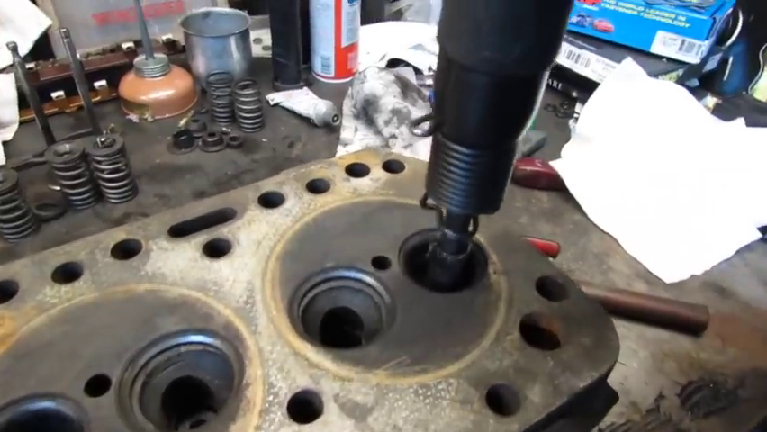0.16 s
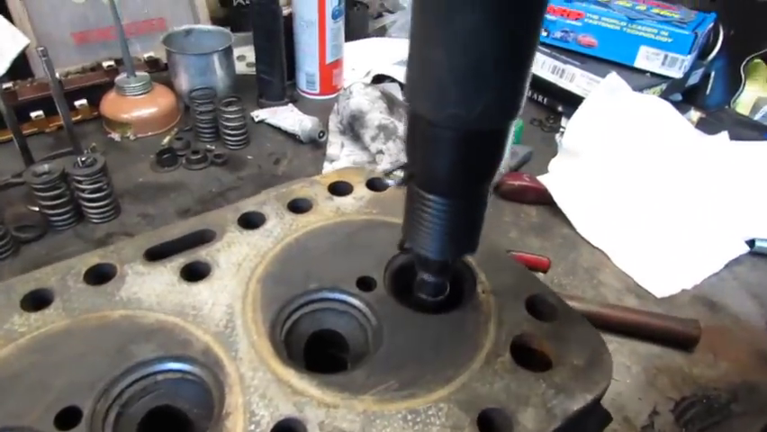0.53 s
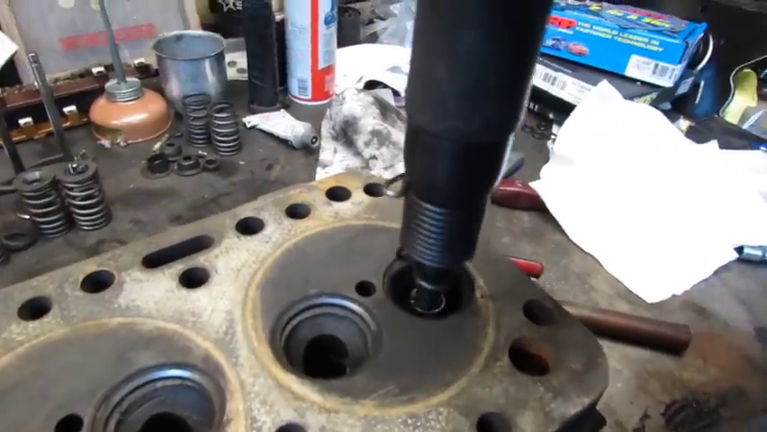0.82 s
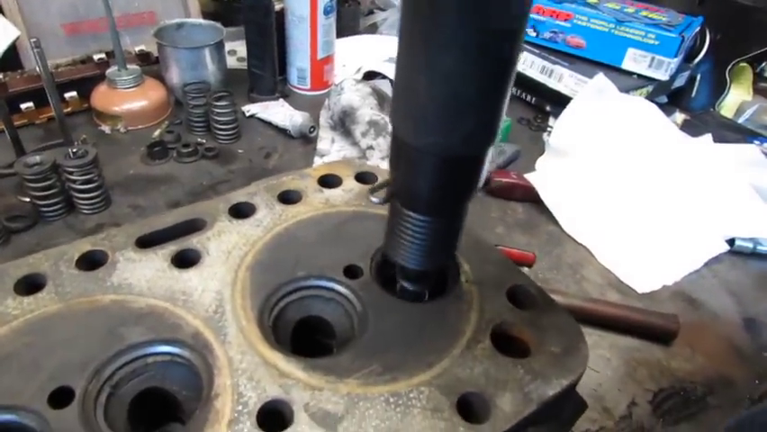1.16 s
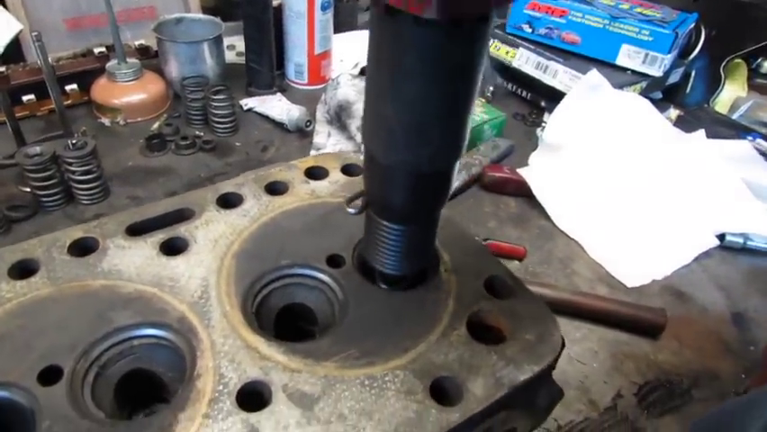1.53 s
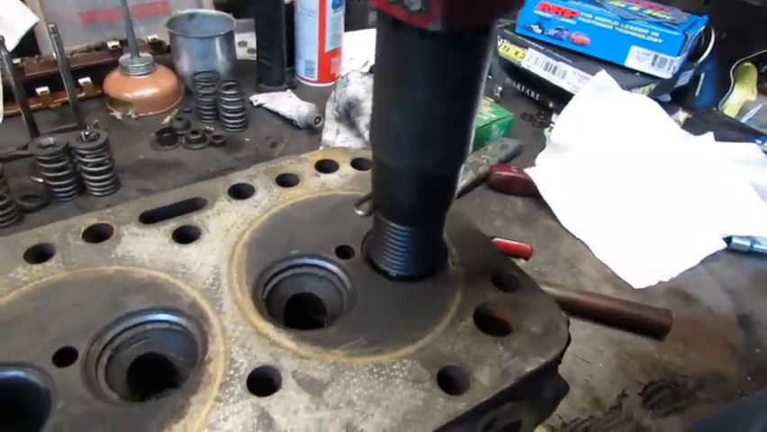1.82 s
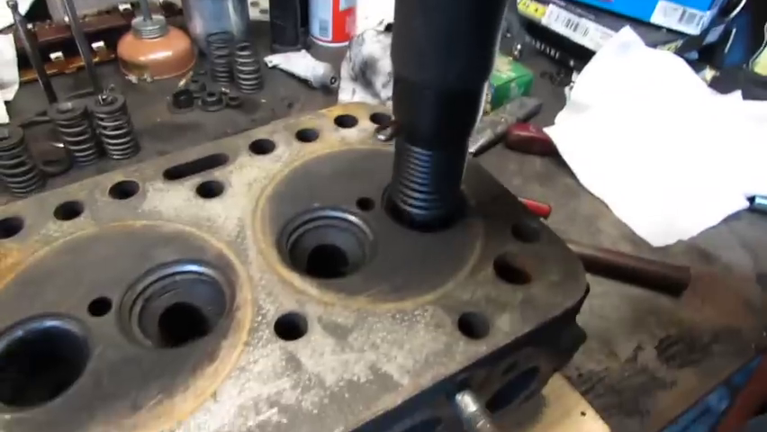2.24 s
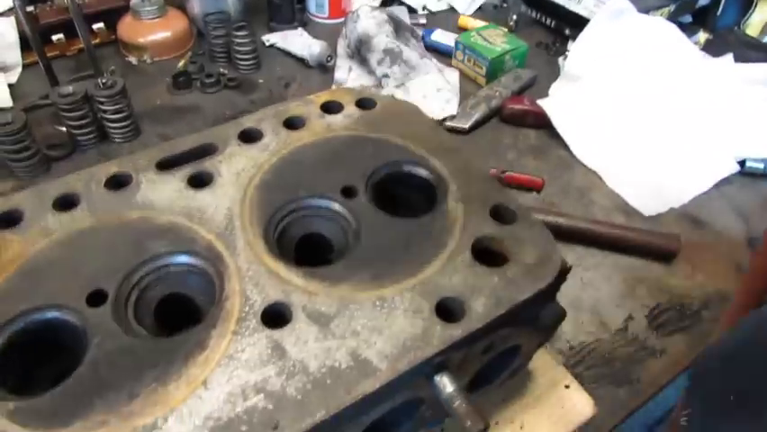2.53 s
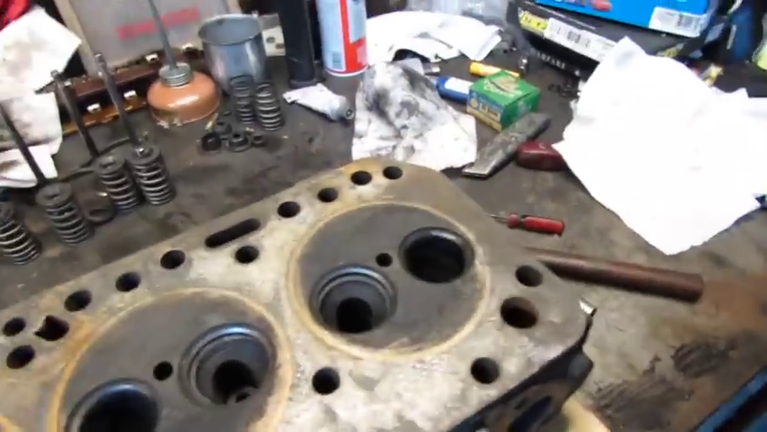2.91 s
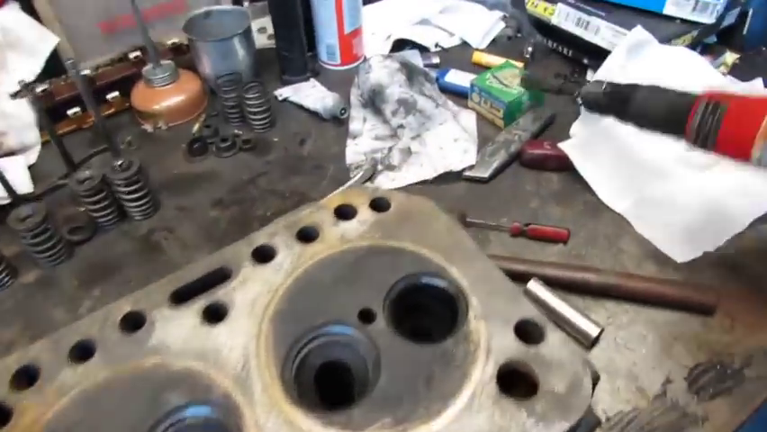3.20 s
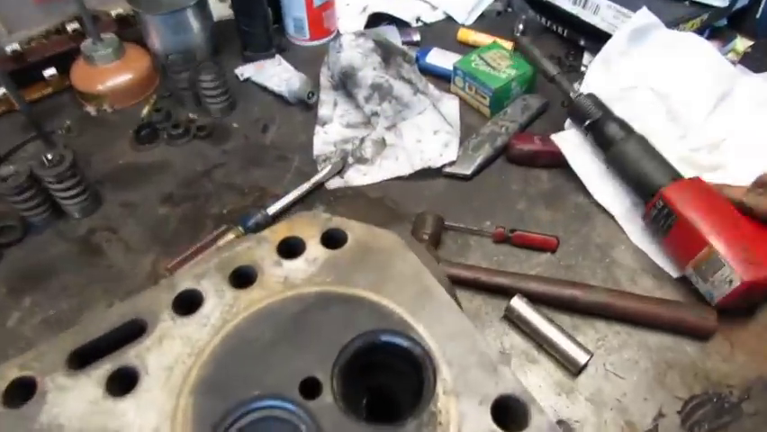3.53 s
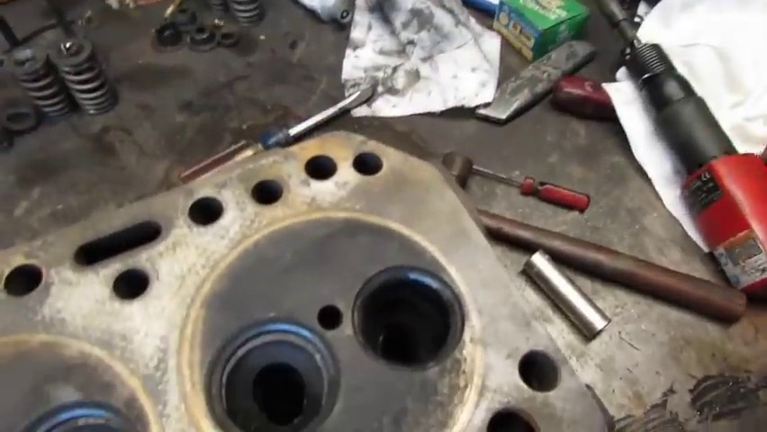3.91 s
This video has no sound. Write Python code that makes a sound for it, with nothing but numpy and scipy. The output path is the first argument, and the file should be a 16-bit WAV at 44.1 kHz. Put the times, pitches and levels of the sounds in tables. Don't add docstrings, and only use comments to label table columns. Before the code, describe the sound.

A pneumatic air hammer rattles loudly in bursts against a cast-iron engine head, then loose metal clinks and the tool is set down.

```python
import sys
import numpy as np
from scipy import signal
from scipy.fft import rfft, irfft
from scipy.io import wavfile
from scipy.ndimage import uniform_filter1d

SR = 44100
rng = np.random.default_rng(int(sys.argv[2]) if len(sys.argv) > 2 else 0)


def level_to_linear(level):
    exponent = np.asarray(level, float) / 20
    return 10 ** exponent


def to_wav(sig):
    pcm = np.clip(np.atleast_2d(sig), -1, 1) * 32767
    pcm = np.round(pcm).astype(np.int16)
    wavfile.write(sys.argv[1], SR, pcm.T)


N = 179001

# [start t/s, end t/s, clatter level/dB, sag over the pull/dB, casting ring re clatter/dB]
PULLS = [
    (0.027, 0.752, -18, 4, -13),
    (0.829, 1.006, -17, 1.5, -17.5),
    (1.135, 1.304, -14, -2.5, -18.5),
    (1.431, 1.568, -13, -5.5, -18.5),
    (1.695, 1.866, -13.5, -7, -27),
    (2.284, 2.371, -16.5, 1.5, -37),
]
# [f/Hz, level/dB, time to fade by 60 dB t60/s]
STEEL = [(2650, -15, 0.021), (3360, -1.5, 0.039), (4060, -23, 0.034), (5200, -16, 0.022), (5560, -7, 0.15),
         (5800, -23, 0.056), (6900, -2.5, 0.17), (7120, -3.5, 0.16), (7390, 10, 0.071), (7820, 2.5, 0.041),
         (8036, 6.5, 0.086), (8570, -4.5, 0.13), (10400, -19, .04), (11440, -23.5, 0.066)]


def unit(x):
    return x / np.sqrt(np.mean(x ** 2) + 1e-18)


def coloured(x, spectrum):
    hz, db = np.transpose(spectrum)
    f = np.fft.rfftfreq(N, 1 / SR) + 1
    gain = level_to_linear(np.interp(np.log(f), np.log(hz), db))
    return unit(irfft(rfft(x) * gain, N))


def stereo(spectrum, like):
    like = np.clip(like, -.99, .99)
    mid, side = (coloured(rng.standard_normal(N), spectrum) for _ in range(2))
    return np.sqrt((1 + like) / 2) * mid + np.sqrt((1 - like) / 2) * side * np.array([[1], [-1]])


def ring(x, modes, spread_db=0., detune=0.):
    out = 0
    for hz, db, t60 in modes:
        chance = rng.standard_normal(2)
        turn = 2j * np.pi * hz * (1 + detune * chance[0]) / SR
        decay = np.log(1000) / (max(t60, .005) * SR)
        pole = np.exp(turn - decay)
        out = out + level_to_linear(db + spread_db * chance[1]) * signal.lfilter([1], [1, -pole], x).imag
    return out


def struck(blows, modes):
    x = np.zeros(N)
    for s, db in blows:
        x[int(s * SR)] = level_to_linear(db)
    return ring(x, modes)


def linger(x, seconds):
    return signal.lfilter([1], [1, -np.exp(-1 / (seconds * SR))], x)


def walk(rate):
    k = int(SR / rate)
    steps = np.repeat(rng.standard_normal(N // k + 1), k)
    return unit(uniform_filter1d(uniform_filter1d(steps, k), k)[:N])


def patchy(x, band_hz, swell_db):
    band = signal.butter(2, band_hz, "band", fs=SR, output="sos")
    return x + signal.sosfilt(band, x) * (level_to_linear(swell_db) - 1)


def dips(x, width_s):
    t = np.arange(-600, 601) / SR
    rebound = .3 * np.exp(-((t - 2.8 * width_s) / (0.98 * width_s)) ** 2)
    dip = rebound - np.exp(-(t / width_s) ** 2)
    return signal.fftconvolve(np.atleast_2d(x), dip[None], "same")


def hammer():
    gains = trigger()
    on = gains[0] > 0
    forward, back = strokes()
    return (pressure_snaps(forward, back, gains[0])
            + gains[0] * punch_clatter(forward, back, on)
            - casting_ring(forward, back, gains[1], on)
            - casting_bell(forward, back, gains[3], on)
            + gains[2] * bore_scrape(forward, back, on)
            + gains[4] * exhaust_gust(forward, on))


def trigger():
    # [t/s, rise/s, t60/s, level/dB]
    slides = [
        (.995, 0.017, 0.083, -35),
        (1.8, 0.043, 0.47, -11),
        (3.675, .015, 0.43, -40),
    ]
    attack_s, attack_db, release_s, release_db = 0.025, -17.5, 0.017, -12
    kick_db, kick_s = 6, 0.13
    thump_db, scrape_db, gust_db = -2.5, -5.5, -3
    ring_grows_db = 1.5
    gust_starts_s, gust_stops_s = 0.014, 0.028
    t = np.arange(N) / SR
    gains = np.zeros((5, N))
    for s, rise, t60, db in slides:
        gains[2] += np.clip(1 + (t - s) / rise, 0, 1) * level_to_linear(db - 60 * np.maximum(t - s, 0) / t60)
    for start, end, db, sag_db, ring_db in PULLS:
        since, left = np.maximum(t - start, 0), np.maximum(end - t, 0)
        share = np.minimum(since / (end - start), 1)
        kick = kick_db * np.exp(-since / kick_s)
        attack = attack_db * np.clip(1 - since / attack_s, 0, 1)
        held = np.clip(since / 0.002, 0, 1) * np.clip(left / 0.0022, 0, 1)
        level = held * level_to_linear(db + sag_db * share + kick + attack)
        shut = level_to_linear(release_db * np.clip(1 - left / release_s, 0, 1))
        ringing = level_to_linear(ring_db + ring_grows_db * (share + 1.5))
        flow = np.clip(left / gust_stops_s, 0, 1) * np.clip(2 * since / gust_starts_s - 1, 0, 1)
        gains += level * np.array([shut, level_to_linear(thump_db) * shut, level_to_linear(scrape_db) * shut, ringing,
                                   level_to_linear(gust_db) * flow])
    return gains


def strokes(jitter_s=.0003, scatter_db=1.5):
    # [back stroke t/s, cycle number]
    pull_cycles = [
        [(.056, 0), (.0837, 1), (.43, 14), (.588, 20), (.6702, 23), (.702, 24), (.735, 25)],
        [(.8205, 0), (.8498, 1), (.9076, 3), (.9335, 4), (.991, 6)],
        [(1.144, 0), (1.284, 5)],
        [(1.4415, 0), (1.553, 4)],
        [(1.7153, 0), (1.7385, 1), (1.788, 3), (1.8402, 5)],
        [(2.282, 0), (2.3071, 1), (2.3546, 3)],
    ]
    forward_s = .015
    blows = np.zeros((2, N))
    for (start, end, *_), cycles in zip(PULLS, pull_cycles):
        chance = rng.standard_normal((60, 2))
        times, count = np.transpose(cycles)
        stroke = np.arange(60)
        s = np.interp(stroke // 2, count, times, right=end)
        s = s + forward_s * (stroke % 2) + jitter_s * chance[:, 0]
        held = (s > start) & (s < end - .003)
        row = 1 - stroke[held] % 2
        blows[row, (s[held] * SR).astype(int)] = level_to_linear(scatter_db * chance[held, 1])
    return blows


def both_ways(forward, back):
    return forward + level_to_linear(-8) * back


def punch_clatter(forward, back, on):
    # [f/Hz, level per Hz/dB]
    clatter_colour = [(710, -18.5), (1200, -7), (2590, -8.5), (3360, -8), (3670, -8.5), (5390, 1),
                      (6150, 1), (11600, -1.5), (15400, -11), (16000, -33.5), (16500, -39.5)]
    # [t/s, level/dB]
    seating = [(0, -6.5), (.3, 1), (.5, 5), (.62, 1), (.75, -1.5), (.95, 3.5), (1.2, 0.5), (1.5, -2),
               (1.75, 5.5), (2.35, -1)]
    steel_levels = [-6, -6.5, -6.5, -3, 0.5, -0.5]
    t = np.arange(N) / SR
    after = linger(both_ways(forward, back), 0.0048)
    rattle = (1 + .6 * uniform_filter1d(after, size=130)) * level_to_linear(2.3 * walk(250))
    swell_db = np.interp(t, *np.transpose(seating)) + 1.2 * walk(25)
    clatter = patchy(stereo(clatter_colour, like=0.38), (4800, 6200), swell_db) * rattle
    chatter = after * rng.standard_normal((2, N)) * (rng.random((2, N)) < .012)
    steel = ring(chatter, [(hz, db / 2, 0.32 * t60) for hz, db, t60 in STEEL])
    pull = np.clip(np.searchsorted([row[0] for row in PULLS], t) - 1, 0, None)
    steel_db = np.array(steel_levels)[pull]
    return clatter / clatter[:, on].std() + level_to_linear(steel_db) * steel / steel[:, on].std()


def casting_ring(forward, back, gain, on):
    # [f/Hz, level/dB, t60/s]
    casting = [(74.3, -14, 0.016), (149.6, -2.5, 0.012), (237, 13.5, 0.057), (370, 8.5, 0.088),
               (414, -6.5, 0.087), (597, 5.5, 0.025), (800, -17.5, .05), (2140, -5, .08),
               (3220, -18.5, .08), (1610, -3, 0.014), (2700, -7.5, 0.009), (4030, -5.5, 0.0077),
               (5520, 3.5, 0.0053)]
    blows = both_ways(forward, back)
    body = ring(blows * gain, casting) / ring(blows, casting)[on].std()
    return level_to_linear(-4.5) * body * np.array([[-.7], [1.1]])


def casting_bell(forward, back, gain, on):
    # [f/Hz, level/dB, t60/s]
    bell_modes = [(992.6, -3, 0.125), (1032, 2, 0.125), (1020, -11.5, 0.054), (927, -16.5, 0.04)]
    # [f/Hz, level/dB, t60/s]
    free_modes = [(1028, 0, .07), (990, -5, .06), (1072, -8, .04)]
    # [t/s, level/dB]
    bell_blows = [(.69, -17.5), (.722, -21), (.743, -14), (.768, -21), (.782, -23), (.98, -15.5),
                  (1.003, -21.5)]
    bell = ring((forward + 0.77 * back) * gain, bell_modes) / ring(forward + back, bell_modes)[on].std()
    bell = bell + struck(bell_blows, free_modes)
    waver_db = -1.0 + 1.5 * walk(98) + 1.2 * walk(22)
    return level_to_linear(waver_db) * bell * np.array([[1.2], [.3]])


def bore_scrape(forward, back, on):
    colour = [(500, -31.0), (800, -11.5), (1050, -9.5), (1500, -5.0), (2500, -3.0), (4200, -4.5),
              (7000, -25.5)]
    scrape = stereo(colour, like=0.081) * (1 + linger(forward + back, 0.0054))
    return level_to_linear(-2.0) * scrape / scrape[:, on].std()


def exhaust_gust(forward, on):
    # [f/Hz, level per Hz/dB]
    gust_colour = [(12, -28.5), (20, 9), (185, -1.5), (329, 1.5), (608, -2.5), (702, -6.5), (1010, -6),
                   (1500, -14), (1950, -49.5), (3300, -120)]
    puffs = .35 + linger(forward, .012)
    gust = stereo(gust_colour, like=-0.47) * puffs * level_to_linear(0.7 * walk(120))
    return gust / gust[:, on].std()


def pressure_snaps(forward, back, gain):
    return dips(gain * (forward + 0.56 * back), 0.00014) * level_to_linear(6.5)


def buffets():
    # [t/s, peak level/dB, share at the left port]
    eddy_table = [(0.0535, -14, 0.4), (0.1057, 2, -0.64), (0.119, -14.5, -0.42), (0.1293, -4.5, -0.069),
                  (0.1357, -4, -1.2), (0.156, -5, -0.96), (0.162, -14.5, 0.11), (0.172, -9, -0.3),
                  (0.1852, 0, -0.17), (0.1985, -9.5, -0.2), (0.219, -7.5, -0.0087), (0.24, -12.5, -0.39),
                  (0.2666, -4, -0.2), (0.2779, -6.5, -1.4), (0.297, -5, -0.29), (0.3207, -5, -0.98),
                  (0.347, -10.2, -0.5), (0.3807, -6.5, -0.89), (0.4754, -15, -1.3), (0.4933, -14.5, 0.11),
                  (0.5443, -15.5, 0.44), (0.6623, -15.5, -1), (0.8382, -12.5, 0.99), (0.878, -19, -0.26),
                  (0.9322, -13.5, -0.3), (0.9634, -20.5, 0.2), (0.9758, -17, 0.4), (1.2596, -9.5, -0.43),
                  (1.5175, 0, -0.13), (1.719, -14, 0.2), (1.743, -22.5, -0.28), (1.7654, -4, -1.1),
                  (1.795, -11.2, -1), (2.3399, -16, -0.2), (2.3504, -10, -0.061), (3.5285, -18.5, 0.72)]
    # [t/s, peak level/dB]
    snap_table = [(0.053, -8.5), (.0698, -9.5), (.0775, -11), (.6858, -13), (0.7635, -17), (.9772, -15),
                  (1.5393, -7.5), (1.7153, -4.5), (1.7997, -7.5), (1.8061, -7.5), (2.3432, -2)]
    eddies, snaps = np.zeros((2, N)), np.zeros(N)
    for s, db, share in eddy_table:
        eddies[:, int(s * SR)] = level_to_linear(db + 1.5) * np.array([share, 1])
    for s, db in snap_table:
        snaps[int(s * SR)] = level_to_linear(db + 1)
    return dips(eddies, 0.00081) + dips(snaps, 0.00014)


def thumps():
    # [t/s, peak level/dB, f/Hz]
    thump_table = [(0.032, -14.5, 670), (0.052, -17, 310), (0.069, -9, 246), (0.761, -8, 624),
                   (0.834, -12.5, 197), (0.978, -6, 380), (1.269, -8.5, 390), (1.542, -11, 285),
                   (1.612, -23, 645), (1.701, -16, 800), (1.854, -10, 717), (2.306, -18.5, 154),
                   (2.342, -9, 393), (2.385, -13, 685), (2.391, -21.5, 150), (2.321, -18, 300),
                   (0.041, -17.5, 60.6), (3.231, -35, 530), (3.248, -25, 444), (3.309, -40.5, 356),
                   (3.518, -22, 288), (3.522, -13.5, 294), (3.5261, -13.5, 288), (3.532, -18, 396),
                   (3.565, -32, 290), (3.583, -36, 85), (3.615, -38.5, 85), (3.655, -28, 275),
                   (3.664, -16.5, 615), (3.7, -33, 208), (3.768, -45, 180), (1.99, -36.5, 422),
                   (3.38, -51, 80), (3.827, -42.5, 101), (3.935, -48, 90), (1.716, -19, 300)]
    out = np.zeros(N + SR // 4)
    t = np.arange(SR // 4) / SR
    for s, db, hz in thump_table:
        t60 = 0.044 / np.hypot(1, hz / 180)
        push = -np.sin(2 * np.pi * np.clip(t * hz, 0, 1))
        thud = ring(push, [(hz, 0, t60), (1.525 * hz, -7, t60), (0.39 * hz, -12, 1.2 * t60)])
        i = int(s * SR)
        out[i:i + len(t)] += level_to_linear(db) * thud / np.abs(thud).max()
    return out[:N]


def knocks(table, crack_hz, t60, share):
    def band(x, hz):
        edges = (hz / 2.2, min(hz * 1.46, 18000))
        return signal.sosfilt(signal.butter(3, edges, "band", fs=SR, output="sos"), x)

    out = np.zeros((2, N + SR // 7))
    t = np.arange(SR // 7) / SR
    fade = level_to_linear(-60 * t / max(t60, .01)) * np.clip(t / 0.0011, 0, 1)
    modes = [(hz, db * 0.88, 0.5 * ring_s) for hz, db, ring_s in STEEL]
    for s, bright_db, clack_db, clack_hz in table:
        noise = rng.standard_normal((3, len(t)))
        noise = noise[0] + 1.17 * noise[1:]
        crack, clack = band(noise, crack_hz), band(noise, clack_hz)
        chatter = level_to_linear(3.5 * unit(uniform_filter1d(rng.standard_normal(len(t)), size=60)))
        steel = ring(noise * fade ** 2, modes, spread_db=-2.5, detune=0.013) * chatter
        bright = share * steel / np.abs(steel).max() + (1 - share) * 0.37 * crack * fade
        i = int(s * SR)
        out[:, i:i + len(t)] += level_to_linear(bright_db) * bright + level_to_linear(clack_db + 3.5) * clack * fade ** 0.82
    return out[:, :N]


def handling():
    # [t/s, crack level/dB, clack level/dB, clack f/Hz]
    end_strokes = [(0.0325, -24.5, -22.5, 3700), (0.038, -3.5, -30, 3620), (0.0455, -2.5, -27.5, 3570),
                   (0.0498, 2.5, -22.5, 1500), (0.0525, 2, -20, 1040), (0.0688, 7, -4, 1200),
                   (0.7652, 2, -19, 1100), (0.7705, -4.5, -18.5, 4360), (0.777, -16, -27, 4640),
                   (0.832, -4.5, -23, 1730), (0.9792, -3, -37, 1040), (1.0133, -12, -41.5, 1030),
                   (1.27, -20.5, -13, 1050), (1.5454, -1, -21, 2460), (1.6114, -21.5, -32.5, 1200),
                   (1.7085, -3.5, -11.5, 1210), (1.7145, -2.5, -13, 900), (1.859, 2.5, -12.5, 3700),
                   (2.294, 2.5, -26, 1280), (2.2975, 0, -12.5, 1280), (2.345, -6, -22, 900),
                   (2.366, -1, -36, 1500)]
    tumble = [(1.8785, -11, -35, 2530), (1.885, -17, -33.5, 2500), (1.9155, -16.5, -27, 2570),
              (1.9195, -10.5, -23, 1480), (1.932, -29, -31, 2350), (1.937, -21, -47, 1500),
              (1.967, -26, -31, 2090), (1.971, -15.5, -48, 2110), (1.9837, -24.5, -41, 1930),
              (1.9978, -24, -38.5, 3430)]
    clinks = [(2.398, -2.5, -48, 1500), (2.3911, 1, -21, 2100), (2.4645, -16, -55, 3450),
              (2.4675, -11, -50, 3300), (2.4722, -15.5, -48, 3300), (2.4885, -13, -61, 3320),
              (2.5006, -19.5, -41, 3300), (2.5374, -38, -45, 3100), (2.5428, -19.5, -70, 2970),
              (3.241, -11, -29.5, 2840), (3.2545, -19, -59, 2990), (3.268, -43, -46, 1560),
              (3.2962, -27.5, -47, 2660), (3.2995, -27.5, -54, 2630), (3.67, -20.5, -55.5, 2600),
              (3.713, -38.5, -57.5, 2600), (3.5276, -5.5, -20, 2300), (3.5375, -7, -19, 1140),
              (3.545, -19, -29.5, 2000), (3.557, -19.5, -32.5, 2600), (3.572, -32, -43, 2600),
              (3.5536, -13.5, -30.5, 2600), (3.5652, -36, -29.5, 1400), (3.5977, -32.5, -37, 990),
              (3.6599, -21, -7.5, 1680)]
    ticks = [(2.837, -44, -56, 1750), (2.8814, -35.5, -51.5, 1900), (3.0121, -36.5, -65, 2800),
             (3.0265, -31, -69, 3360), (3.054, -35, -53, 2900), (3.3746, -57.5, -47.5, 902)]
    bench = [(3.2318, -32, -38.5, 2600), (3.2352, -26.5, -42, 2600), (3.238, -30, -41, 2600),
             (3.2465, -18, -26.5, 1320), (3.5235, -18.5, -25, 1220), (3.635, -31, -38.5, 2880),
             (3.6419, -32, -41, 2880)]
    grip = [(3.6548, -6.5, -13.5, 1370), (3.658, -7.5, -14, 1900), (3.667, -24.5, -16.5, 1130),
            (3.6786, -20.5, -29, 1740), (3.7186, -50.5, -47, 1977), (3.7585, -60, -53, 1770),
            (3.9485, -61.5, -60.5, 2035)]
    drag = [(3.077 + k * .0148, -40.5, -48.5, 1700) for k in range(5)]
    return (knocks(end_strokes, crack_hz=7450, t60=0.051, share=0.084)
            + knocks(tumble, crack_hz=5040, t60=0.14, share=.03)
            + knocks(clinks, crack_hz=8230, t60=0.039, share=0.57)
            + knocks(ticks, crack_hz=6000, t60=0.045, share=.07)
            + knocks(drag, crack_hz=3000, t60=0.076, share=0.027)
            + knocks(bench, crack_hz=7640, t60=0.05, share=.07)
            + knocks(grip, crack_hz=4500, t60=0.085, share=.07))


def struck_bodies():
    # [f/Hz, level/dB, t60/s]
    bore = [(1640, -32, 0.036), (2290, -5.5, 0.094), (2400, -7.5, 0.068), (3300, -3, 0.066),
            (3520, -2.5, 0.06), (4170, -1.5, 0.036), (4420, -4, 0.06), (5100, -15, .04), (5500, -1, .04),
            (5700, -10, 0.033), (5862, -4.5, 0.05), (6500, 0, .04)]
    # [t/s, level/dB]
    bore_blows = [(.719, -21), (.735, -29), (.7655, -21.5), (.769, -20), (.7735, -22.5), (.778, -21),
                  (.783, -31), (.98, -21), (.991, -26), (1.27, -29.5)]
    # [f/Hz, level/dB, t60/s]
    barrel = [(337, -10, 0.11), (447, -3.5, 0.11), (1130, -26, 0.042), (1270, -2, 0.047), (1540, -20, .03),
              (1900, -18, 0.027), (2720, -2, .025), (1740, -26.5, 0.15), (2440, -3, 0.045),
              (2990, -2, 0.036), (3370, -11.5, 0.033)]
    # [t/s, level/dB]
    barrel_blows = [(3.233, -43), (3.241, -30.5), (3.249, -31), (3.305, -46.5), (3.524, -29)]
    # [f/Hz, level/dB, t60/s]
    bench_top = [(275, -14, 0.039), (428, -6.5, 0.096), (567, -18, 0.11), (706, -15, 0.054),
                 (820, -4, 0.06), (990, -20, .06), (1130, -15.5, 0.06), (1278, -6, 0.073), (1430, -12, .06),
                 (1690, -8.5, 0.076), (1780, -14, 0.061), (2000, -14, 0.09), (2300, -9, 0.046),
                 (2600, -7, 0.043)]
    # [t/s, level/dB]
    bench_blows = [(3.6553, -14.5), (3.6585, -26), (3.662, -22.5), (3.666, -26), (3.672, -24.5),
                   (3.679, -31.5)]
    bodies = struck(bore_blows, bore) + struck(barrel_blows, barrel) + struck(bench_blows, bench_top)
    return bodies * level_to_linear(np.array([[-1.5], [1.5]]))


def spring_pings():
    # [t/s, level/dB]
    pings = [(.052, -20), (2.4675, -51), (2.473, -46.5), (2.4885, -47), (2.502, -44), (2.543, -49),
             (3.239, -46.5), (3.256, -47.5), (3.264, -52), (3.297, -54.5), (3.527, -26.5), (3.538, -42.5),
             (3.554, -34.5), (3.566, -43), (3.607, -53), (3.659, -36.5), (3.675, -45), (3.691, -45),
             (3.701, -49.5), (3.712, -55)]
    # [f/Hz, level/dB, t60/s]
    spring_modes = [(13480, -4.5, .04), (13620, 0, .065), (13780, -3, .05), (14100, -6, .02),
                    (12300, -8, .02), (10900, -6, .02)]
    return struck(pings, spring_modes) * level_to_linear(3.5 * walk(370))


def shudder():
    # [t/s, level/dB, t60/s]
    landings = [
        (3.528, -30.5, 0.38),
        (3.66, -37.5, 0.49),
    ]
    # [f/Hz, level per Hz/dB]
    bench_colour = [(30, -22.5), (70, 0.5), (110, -3), (200, -0.5), (300, -10), (450, -6), (700, -20),
                    (1200, -69.5)]
    # [f/Hz, level per Hz/dB]
    clutter_colour = [(400, -29), (800, -6), (1200, -1), (2200, 0), (3000, -12.5), (4500, -16),
                      (7000, -33.5)]
    t = np.arange(N) / SR

    def fade(s, db, t60):
        return np.clip((t - s) / 0.0083, 0, 1) * level_to_linear(db - 60 * np.maximum(t - s, 0) / t60)

    buzz = stereo(clutter_colour, like=.3) * fade(3.67, -34, 0.5) * level_to_linear(3.0 * walk(140))
    return stereo(bench_colour, like=0.85) * sum(fade(*row) for row in landings) + buzz


def shop_air():
    # [t/s, level/dB]
    hose = [(0, -42), (.8, -42), (2.2, -52), (2.77, -56), (2.81, -63), (3.04, -54), (3.18, -61),
            (3.5, -57.5), (3.6, -48), (3.75, -66.5), (4.06, -60)]
    # [f/Hz, level per Hz/dB]
    hiss_colour = [(470, -47), (800, -14), (1170, -8.5), (1250, -11), (1970, -9.5), (2950, -3.5),
                   (4150, -6.5), (5990, -7.5), (6710, -3.5), (7720, -8.5), (12000, -11), (15700, -13),
                   (16500, -34.5)]
    # [f/Hz, level per Hz/dB]
    rumble_colour = [(12, -43), (20, -17), (81, 1), (115, -11), (150, -12.5), (195, -1.5), (584, -6.5),
                     (659, -11), (718, -11.5), (1200, -22), (1560, -50), (2640, -120)]
    vent_db, vent_t60_s, vent_low_db = -37.5, 0.43, -0.5
    rumble_db, rumble_follows = -60, 0.092
    t = np.arange(N) / SR
    hose_db = np.interp(t, *np.transpose(hose))
    vent = 0
    for _, end, *_ in PULLS:
        vent = vent + (t > end) * level_to_linear(vent_db - 60 * np.maximum(t - end, 0) / vent_t60_s)
    hiss = stereo(hiss_colour, like=0.082) * np.hypot(level_to_linear(hose_db), vent) * level_to_linear(walk(57))
    low = level_to_linear(rumble_db + rumble_follows * (hose_db - rumble_db))
    rumble_level = np.hypot(low, level_to_linear(vent_low_db) * vent) * level_to_linear(0.36 * walk(13))
    return hiss + stereo(rumble_colour, like=0.77) * rumble_level


def machine_tone():
    # [start t/s, end t/s, level/dB]
    spells = [(-.1, 0.03, -44.5), (2.088, 2.3, -59.5), (2.35, 2.8, -69), (2.93, 3.097, -58),
              (3.103, 3.512, -56.5), (3.6, 4.1, -73)]
    fade_db_s = 89
    t = np.arange(N) / SR
    levels = []
    for start, end, db in spells:
        outside = np.maximum(np.maximum(start - t, t - end), 0)
        levels.append(db - fade_db_s * outside)
    tone_db = np.max(levels, axis=0)
    phase = 2 * np.pi * np.cumsum(718 + 0.4 * walk(6)) / SR
    tone = np.sin(phase) * level_to_linear(-0.5 + tone_db + 1.3 * walk(14))
    return tone * level_to_linear(np.array([[1.5], [-1.5]]))


def room(x):
    t60_s = 0.13
    t = np.arange(SR // 2) / SR
    noise = rng.standard_normal((2, len(t)))
    dull = signal.lfilter([.3], [1, -.7], signal.lfilter([.6], [1, -.4], noise))
    tail = dull * level_to_linear(-60 * t / t60_s) + .5 * noise * level_to_linear(-60 * t / (1.89 * t60_s))
    tail = tail * np.clip(t / 0.0055, 0, 1)
    tail = signal.sosfilt(signal.butter(1, 150, "high", fs=SR, output="sos"), tail)
    tail = tail / np.sqrt((tail ** 2).sum(axis=1, keepdims=True))
    return signal.fftconvolve(x, tail, axes=1)[:, :N]


def scene():
    near = hammer() + handling() + struck_bodies() + thumps() + shudder() + spring_pings()
    return near + level_to_linear(-11.5) * room(near) + buffets() + shop_air() + machine_tone()


def roll_off(x):
    return signal.sosfilt(signal.butter(12, 15900, fs=SR, output="sos"), x)


def record(dry):
    limit_db, limit_s, limit_share = -15, .009, .5
    x = signal.sosfilt(signal.butter(2, 27, "high", fs=SR, output="sos"), dry)
    keep = np.exp(-1 / (limit_s * SR))
    power = signal.lfilter([1 - keep], [1, -keep], (x ** 2).mean(axis=0))
    loudness = np.sqrt(power + 1e-12)
    x = x * np.minimum(level_to_linear(limit_db) / loudness, 1) ** limit_share
    x = np.tanh(1.3 * x) / 1.3
    x = signal.sosfilt(signal.ellip(8, .2, 90, 16000, fs=SR, output="sos"), x)
    return roll_off(x)


dry = scene()
out = record(dry)
to_wav(out)
```